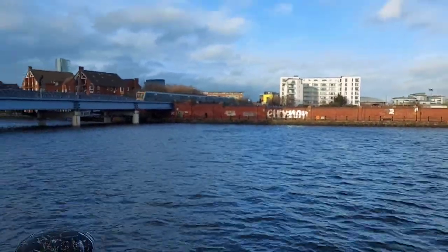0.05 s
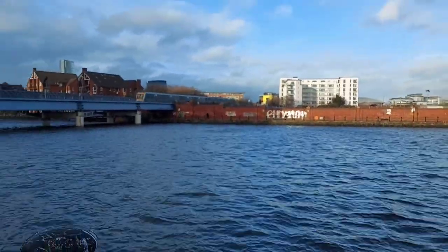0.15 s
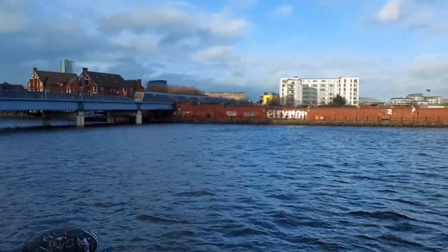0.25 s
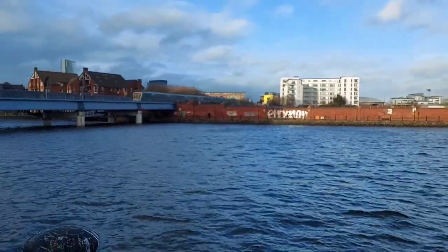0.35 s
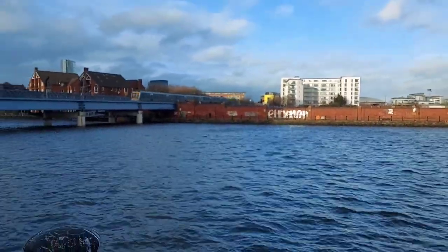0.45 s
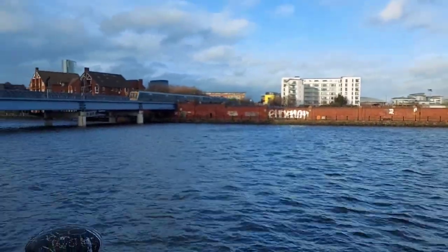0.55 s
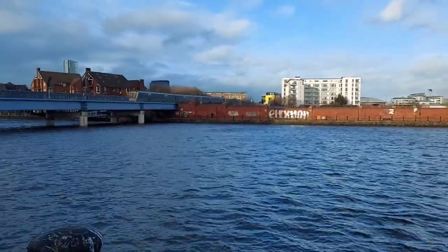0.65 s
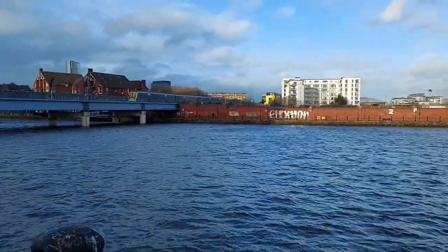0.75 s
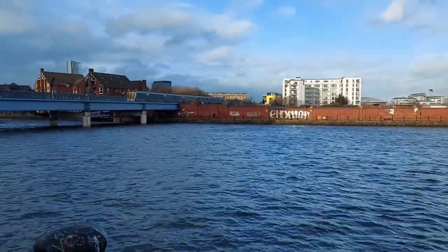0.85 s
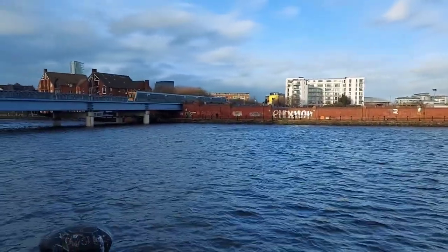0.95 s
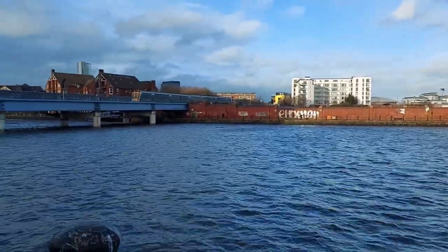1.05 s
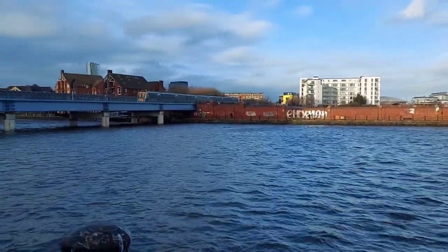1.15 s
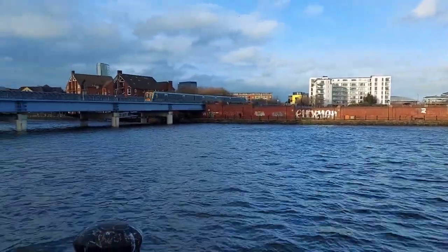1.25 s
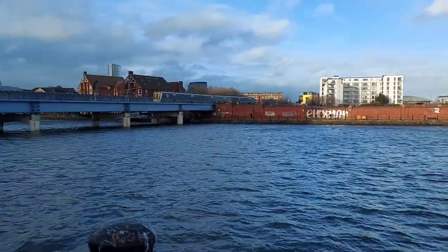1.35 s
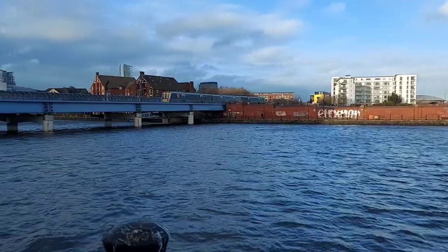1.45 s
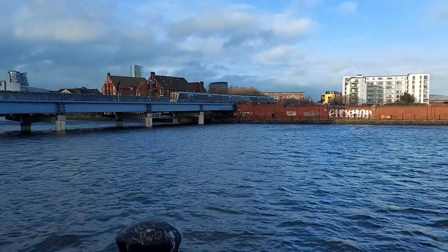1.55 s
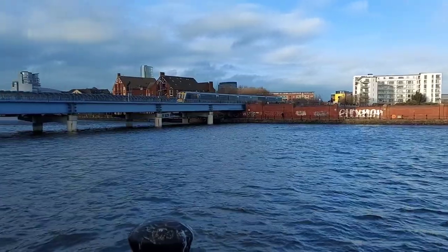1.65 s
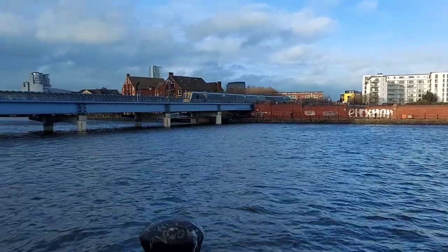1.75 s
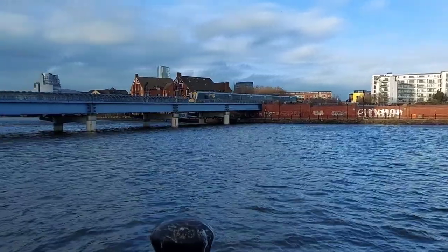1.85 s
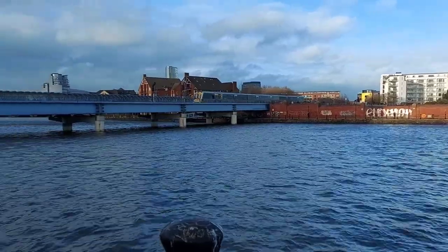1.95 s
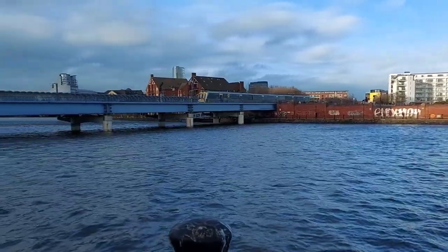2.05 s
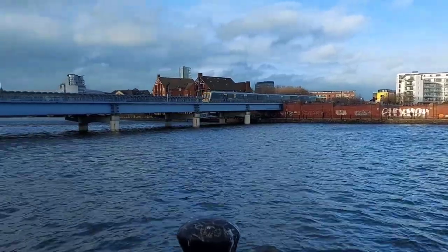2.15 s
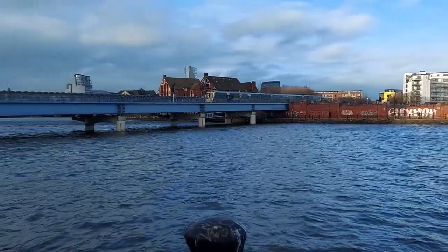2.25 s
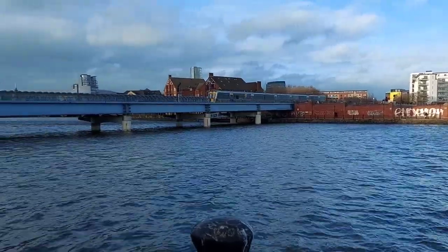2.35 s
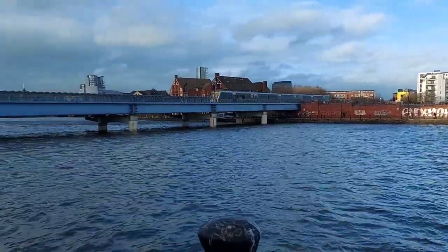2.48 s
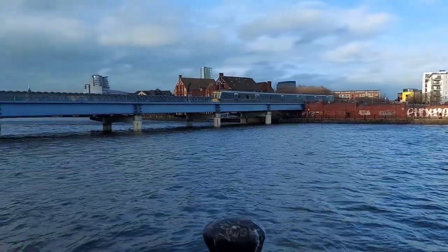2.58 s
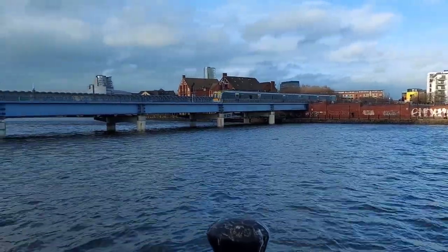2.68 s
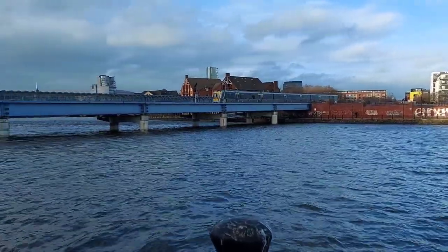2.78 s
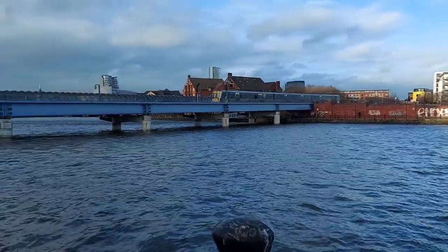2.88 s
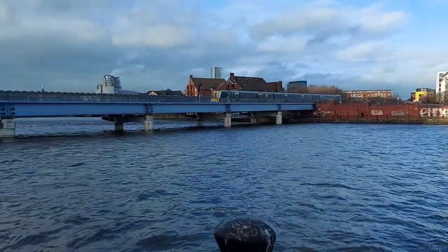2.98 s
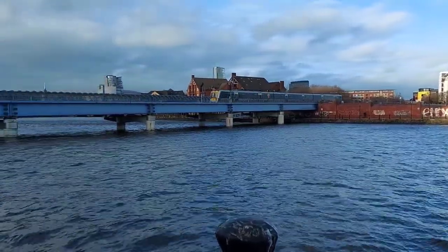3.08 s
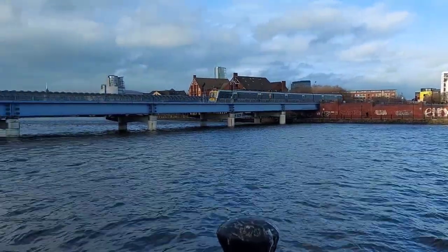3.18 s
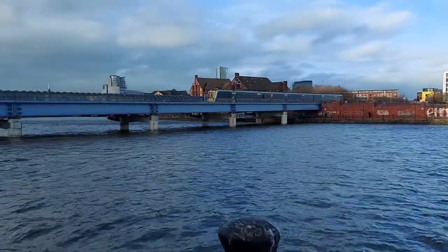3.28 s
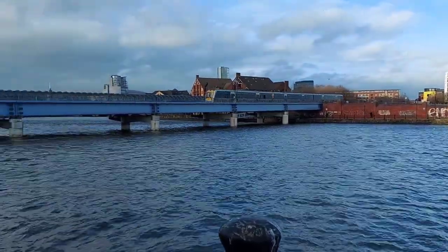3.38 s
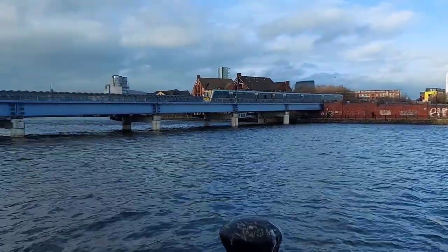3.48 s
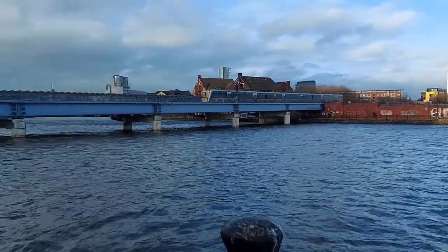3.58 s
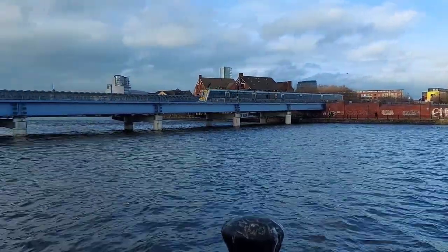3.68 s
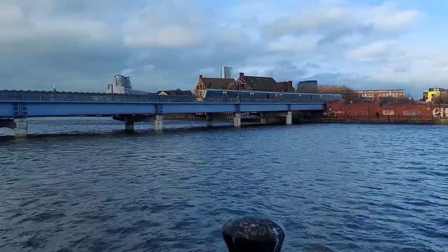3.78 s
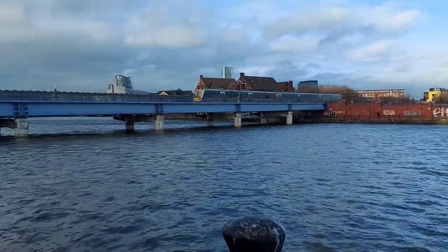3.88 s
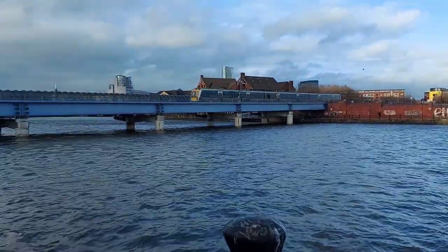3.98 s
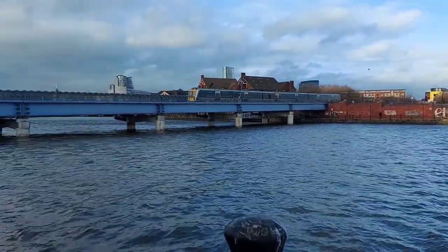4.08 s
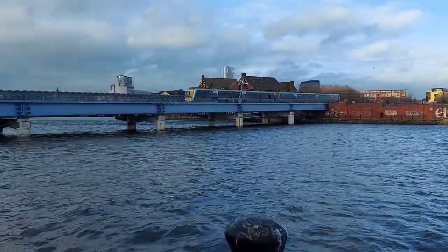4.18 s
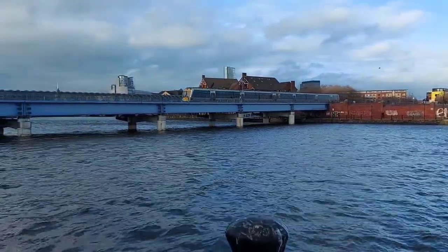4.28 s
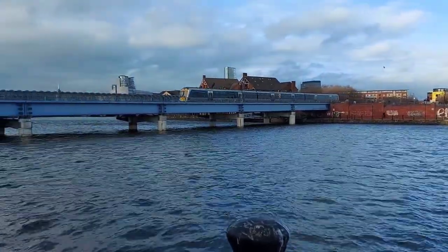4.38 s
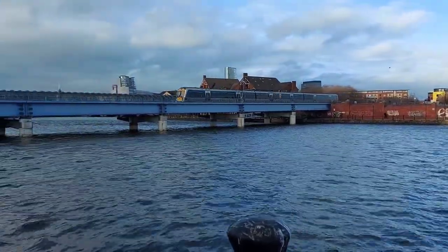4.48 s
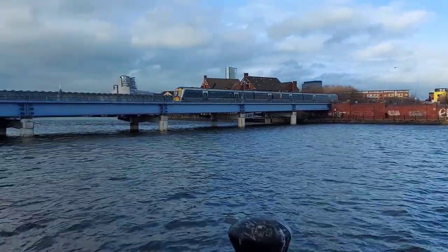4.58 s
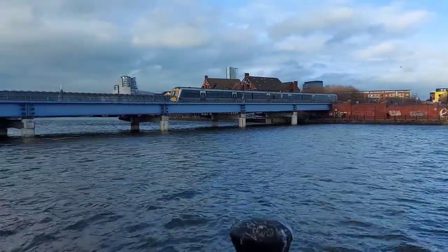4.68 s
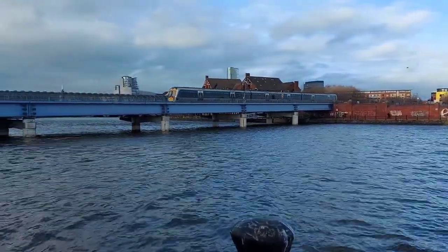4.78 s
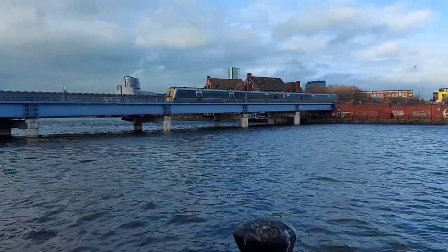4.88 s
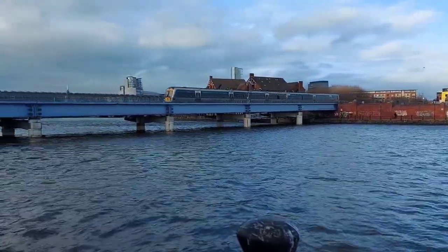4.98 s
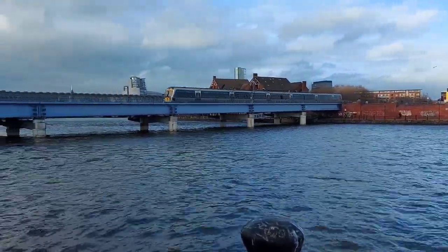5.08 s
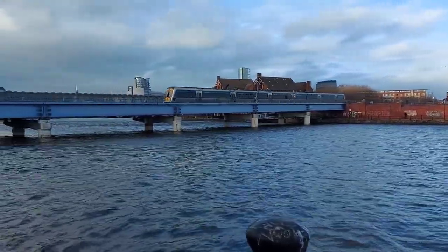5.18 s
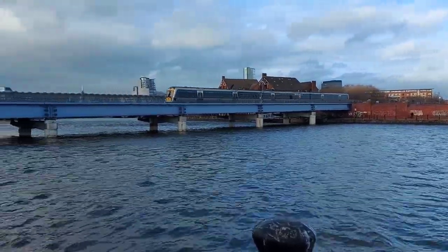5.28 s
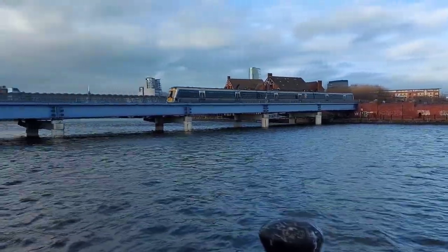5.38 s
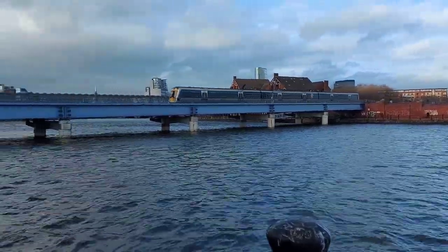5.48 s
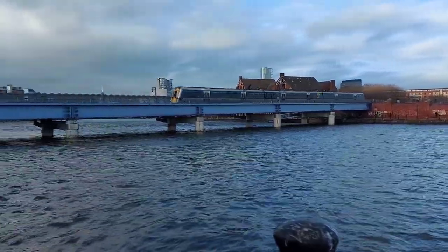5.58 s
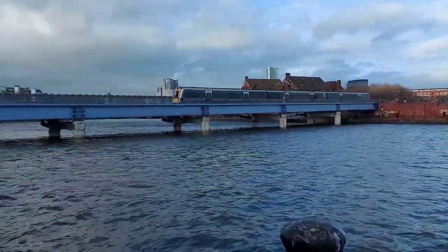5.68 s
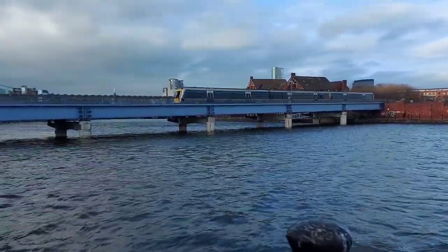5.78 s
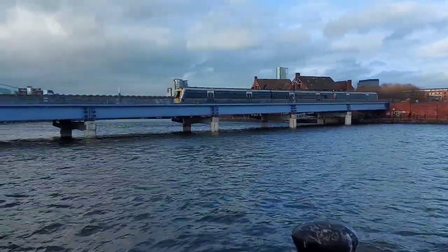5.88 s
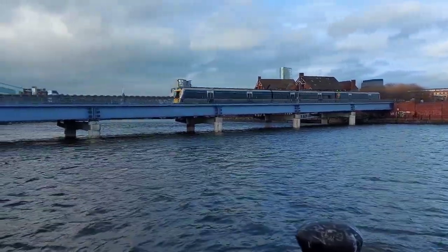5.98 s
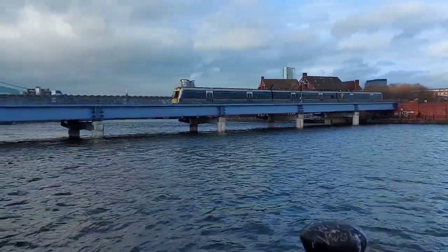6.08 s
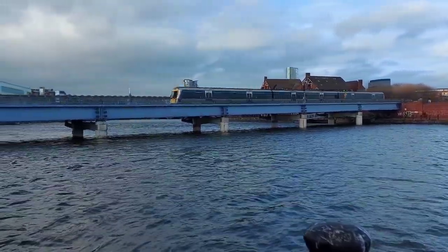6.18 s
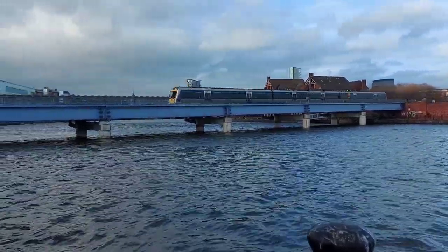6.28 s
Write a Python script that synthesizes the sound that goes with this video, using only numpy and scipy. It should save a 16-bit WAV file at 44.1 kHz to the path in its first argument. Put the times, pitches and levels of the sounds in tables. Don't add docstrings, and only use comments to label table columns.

```python
import sys
import numpy as np
from scipy import signal
from scipy.fft import rfft, irfft, next_fast_len
from scipy.io import wavfile
from scipy.ndimage import uniform_filter1d

SR = 44100
rng = np.random.default_rng(int(sys.argv[2]) if len(sys.argv) > 2 else 0)


def dump_mix(stems):
    frames = np.atleast_2d(stems).T
    limited = np.clip(frames, -1, 1)
    pcm = np.round(limited * 32767).astype(np.int16)
    wavfile.write(sys.argv[1], SR, pcm)


def boost(x):
    u = np.asarray(x, float) / 20
    return 10 ** u


N = 279594
TIME = np.arange(N) / SR

# freq_hz, level_db (per Hz)
TOWN_COLOUR = [(80, 0), (150, -9.5), (330, -7), (600, -16.5), (900, -14.5), (1400, -16.5), (1800, -23),
               (2300, -21.5), (2900, -28.5), (4000, -29.5), (5000, -38), (6700, -40), (8300, -40),
               (12000, -95)]
# freq_hz, level_db (per Hz)
HISS_COLOUR = [(3000, -21), (4500, 7), (6000, 12.5), (8300, 4.5), (12000, -28)]
# freq_hz, level_db (per Hz)
RUSTLE_COLOUR = [(5180, -60), (9000, -25), (9500, -1), (10200, 7), (11000, 9), (12500, 6), (14400, 4),
                 (15300, -6)]
# start_s (centre), level_db, length_s
GUSTS = [
    (.2, -74, 0.52),
    (0.815, -67.5, 0.5),
    (2.22, -76, 0.63),
    (3.45, -74, 0.41),
    (4.449, -78, 0.88),
    (5.7, -75, 0.84),
]
# start_s (centre), peak_db, left_minus_right_db,
# pitch_hz, length_ms
PORT_TICKS = [(.004, -62, -11, 14500, .15), (.0144, -63, -11, 13500, .08), (.0458, -59, -12, 14000, .1),
              (.056, -62, -9, 13000, .1), (.062, -62, -10, 13170, .15), (.0752, -48, -13, 13500, 0.05),
              (.167, -55, -8, 13500, .06), (.3207, -60, -10, 13510, .12), (.328, -57, -10, 14000, .08),
              (3.1627, -62, -1, 11100, .1), (3.253, -68, -1.5, 14500, .15), (3.3553, -63, 0, 11000, .1),
              (3.3745, -52, -4, 12500, .05), (4.2483, -61, 1, 13600, .15), (4.591, -60, -3, 12240, .17),
              (4.6139, -59, 5, 12000, 0.168), (4.7003, -45, 0, 13500, 0.041),
              (4.7546, -59, 5, 12030, .15), (4.9995, -61, 4, 11000, 0.1202),
              (5.1643, -60, -2, 10800, 0.14), (5.295, -63, 1, 13000, .08), (5.5557, -61, -1, 11100, .1),
              (5.6017, -58, -1.5, 11000, .1), (5.7186, -59, -1, 13000, .08),
              (5.8436, -61, -2, 13000, .1)]
# freq_hz, left_minus_right_db
PORT_SHADE = [(60, 0.5), (110, -1), (200, 1), (380, -0.5), (690, 0.0), (1280, 0.0), (2370, 0), (4360, -1.5),
              (8050, -8), (14800, -7)]
# start_s, pitch_hz, level_db
FLANGE_SQUEAL = [(.874, 1533, -75), (.89, 1480, -43), (.93, 1465, -47), (.945, 1480, -51),
                 (1.0, 1470, -49.5), (1.09, 1425, -50), (1.11, 1465, -50), (1.2, 1450, -50),
                 (1.225, 1458, -53), (1.255, 1470, -49), (1.283, 1450, -52), (1.295, 1450, -80)]
# start_s (centre), pitch_hz, level_db, length_s, width_hz
RAIL_CHIRPS = [(0.41, 4290, -51, .06, 60), (.4, 2520, -49, .035, 300), (.643, 2250, -45, .05, 350),
               (.69, 2180, -50, .05, 200), (.615, 2200, -51, .04, 200), (.37, 2230, -53, .09, 400),
               (1.035, 4170, -50, .035, 120), (1.025, 2150, -53, .08, 700), (.883, 1620, -53, .045, 150),
               (1.46, 1450, -51, .05, 150), (2.826, 2750, -49, .03, 300), (2.835, 650, -38, .06, 500),
               (2.85, 1550, -47, .05, 500), (3.073, 1500, -46, .02, 1600), (3.097, 700, -39, .04, 300),
               (3.09, 4300, -52, .05, 900), (3.37, 2300, -52, .08, 400), (4.452, 770, -31, .025, 250),
               (4.475, 2130, -45, .09, 250), (4.605, 950, -45, .05, 250), (4.725, 2150, -47, .05, 350),
               (5.15, 2150, -53, .1, 120), (3.81, 2000, -49, .06, 350), (3.385, 700, -41, .04, 200),
               (5.255, 600, -35, .06, 450), (5.25, 2250, -48, .04, 600), (5.465, 2750, -50, .04, 300),
               (5.47, 4300, -53, .03, 600), (5.525, 2150, -49, .1, 500), (5.58, 4050, -55, .025, 400),
               (5.745, 780, -39, .035, 500), (5.76, 2250, -51, .09, 450), (5.79, 1400, -47, .03, 300),
               (6.0, 1400, -51, .4, 300), (1.285, 2000, -50, .012, 1400), (5.25, 1400, -44, .04, 900),
               (5.745, 3900, -52, .03, 1800), (2.83, 2100, -50, .05, 1200), (3.15, 550, -41, .2, 400)]
# start_s, peak_db, thud_db, middle_db, brightness_db
JOINT_BLOWS = [
    (2.811, -28.5, -19.5, -3, 5.5),
    (3.062, -31, -30, 5, -1),
    (3.8, -44.5, -35, -5, 12),
    (4.441, -26, -30, 0, 4.5),
    (4.705, -28, -29, -2, -2),
    (5.232, -26.5, -23.5, -9, -12),
    (5.457, -30, -25, -5, 1),
    (5.508, -31, -25, 3, -6),
    (5.733, -32, -24, -8, 8.5),
    (5.78, -38, -44, -1, -2),
]
# delay_s, level_db
JOINT_BOUNCES = [
    (0, 7.5),
    (.011, -1),
    (.026, -14),
    (.05, -15),
]
# freq_hz, level_db (per Hz)
CRACK_COLOUR = [(240, -0.5), (400, -2), (788, 2), (921, -6), (1490, -7), (1840, -19), (2120, -12.5),
                (2580, -22.5), (2820, -18.5), (6670, -37.5), (9000, -47), (11700, -75), (19800, -120)]
# pitch_hz, level_db, ring_s
RAIL_MODES = [(770, 1, .06), (600, -6, .08), (1150, -9, .05), (1500, -8, .06), (2800, -16, .05)]
# pitch_hz, level_db, ring_s
DECK_MODES = [(149, 4, 0.049), (223, 8, 0.049), (294.9, 6.5, 0.056)]
# start_s, peak_db, pitch_hz
GIRDER_LURCHES = [(0.084, -36.5, 124.7), (0.252, -32, 138), (0.367, -39, 217), (0.426, -32, 105.7),
                  (0.67, -35, 133), (1.082, -30, 123.5), (1.159, -42, 163), (1.528, -35.5, 232.1),
                  (1.657, -23, 121), (1.677, -29, 178), (1.722, -33, 128), (2.068, -30, 134),
                  (2.265, -29.5, 153), (2.514, -30, 186), (2.616, -30, 149), (2.679, -29, 137),
                  (2.802, -20.5, 148), (2.875, -26, 143), (2.893, -31, 240), (2.965, -29.5, 147.5),
                  (3.049, -30, 122.5), (3.109, -33, 130.5), (3.267, -33, 126.4), (3.326, -30, 178.2),
                  (3.332, -24, 116.1), (3.392, -29, 145), (3.456, -27, 138.5), (3.688, -29.5, 156),
                  (3.779, -22, 132), (4.063, -30, 251.7), (4.109, -29, 137.5), (4.26, -28, 132),
                  (4.423, -31, 180), (4.428, -30, 238.4), (4.584, -24, 143.7), (4.639, -32, 223),
                  (4.713, -23.5, 259.6), (4.731, -37, 178.2), (4.805, -30, 221), (4.853, -25, 144.2),
                  (4.905, -24.5, 105), (5.108, -28, 215.4), (5.176, -28.5, 202), (5.214, -26.5, 243),
                  (5.278, -29, 206), (5.398, -23, 207.2), (5.527, -26, 187.6), (5.617, -23, 148.2),
                  (5.623, -27, 196.3), (5.691, -23.5, 203.4), (5.807, -24, 128.6), (5.853, -25, 191),
                  (5.926, -26, 191.4), (5.988, -22.5, 148), (6.046, -22, 118), (6.118, -29, 188),
                  (6.146, -23, 107.8), (6.16, -25.5, 239.6), (6.22, -22, 155.5)]
# freq_hz, level_db (per Hz)
BOOM_COLOUR = [(12, -53), (20, -30), (70, 8), (86, -2), (160, -4.5), (210, -40), (350, -120)]
# freq_hz, level_db (per Hz)
GIRDER_COLOUR = [(53, -46), (90, 1.5), (172, -9.5), (225, -10), (314, -4), (409, -24), (500, -22.5),
                 (650, -59), (1100, -120)]
# freq_hz, level_db (per Hz)
ROLL_COLOUR = [(220, -3.5), (380, 1), (476, -16.5), (544, -0.5), (622, -1.5), (729, -1), (1100, -10.5),
               (1390, -29), (1710, -19), (2110, -24), (2800, -30), (3640, -64), (6160, -120)]
# pitch_hz, width_hz, level_db
WHEEL_SONG = [(559, 66, -16.5), (2145, 320, -19), (4200, 520, -43)]
# start_s, drive_db
DECK_LOAD = [(0, 2), (.6, -2.5), (1.0, 2), (1.4, 0), (2.0, 2), (2.4, 1), (2.75, 1.5), (3.0, 7), (3.4, 4.5),
             (3.75, 6), (4.2, 2.5), (4.7, 7.5), (5.0, 5), (5.4, 5.5), (5.7, 7.5), (6.0, 5.5), (6.34, 7.5)]
# start_s (centre), level_db, length_s
DECK_LULLS = [
    (0.248, -4, 0.14),
    (0.516, -7, 0.06),
    (1.067, -5, .1),
    (1.5, -3.5, 0.085),
    (1.99, -4, 0.11),
    (2.333, -3.5, 0.074),
    (2.72, -7, 0.099),
    (2.97, -5, 0.081),
    (3.5, -5, 0.043),
    (5.029, -2, .1),
]
# start_s (centre), pitch_hz, level_db, length_s
EXHAUST_THROBS = [(0.122, 70, -40, 0.081), (0.313, 67, -31.5, 0.05), (0.381, 87, -38, 0.083),
                  (0.571, 65.3, -31, 0.03), (0.641, 81.4, -34.5, 0.09), (0.75, 88.7, -33.5, 0.17),
                  (0.9, 81, -25.5, 0.077), (1.016, 83.3, -27.5, 0.094), (1.115, 69.5, -37, 0.04),
                  (1.219, 74.7, -28, 0.11), (1.379, 91.7, -25, 0.11), (1.674, 72.8, -23.5, 0.046),
                  (1.83, 82.8, -22.5, 0.056), (1.932, 82.5, -21.5, 0.04), (2.053, 77.9, -31, 0.072),
                  (2.169, 80.4, -22.5, 0.08), (2.371, 65, -36, 0.04), (2.434, 64.85, -25.5, 0.038),
                  (2.55, 86.1, -25, 0.031), (2.626, 75, -27, 0.056), (2.696, 75.1, -29, 0.036),
                  (2.824, 70.2, -26, 0.066), (2.889, 80.9, -26, 0.06), (3.025, 74.36, -20.5, 0.057),
                  (3.131, 75, -24, 0.085), (3.239, 78, -22, 0.05), (3.344, 75.7, -28, 0.058),
                  (3.454, 72.84, -21.5, 0.036), (3.638, 78, -23, 0.082), (3.831, 81, -20.5, 0.039),
                  (3.921, 75.5, -15, 0.028), (4.087, 74.95, -21, 0.044), (4.184, 73.25, -25, 0.05),
                  (4.33, 67.07, -25, 0.11), (4.612, 65, -29, 0.049), (4.675, 82.8, -29, 0.03),
                  (4.745, 65.1, -25, 0.038), (4.833, 81, -26.5, 0.039), (4.907, 73.3, -27, 0.05),
                  (5.134, 75.2, -24, 0.068), (5.26, 81.04, -24, 0.067), (5.438, 100, -23.5, 0.093),
                  (5.511, 59, -21.5, 0.057), (5.699, 78, -23.5, 0.078), (5.825, 45.96, -28, 0.08),
                  (5.913, 65, -20, 0.041), (6.032, 77.9, -27, 0.11), (6.108, 78, -29, 0.15),
                  (6.262, 75, -26, 0.067)]
# start_s (centre), pitch_hz, level_db, length_s
RIPPLE_HUMS = [(0.092, 303.6, -40, 0.11), (0.158, 304.2, -37.5, 0.15), (0.325, 309, -37, 0.21),
               (0.435, 325, -36, 0.19), (0.615, 320, -35, 0.051), (0.69, 330.3, -40.5, 0.04),
               (0.878, 325, -40, 0.12), (0.996, 321.3, -35, 0.11), (1.265, 324, -34.5, 0.042),
               (1.351, 333.3, -37.5, 0.039), (1.499, 283, -38.5, 0.07), (1.602, 296, -31.5, 0.042),
               (1.696, 296, -32.5, 0.059), (1.79, 304, -30.5, 0.04), (1.898, 306.3, -29.5, 0.038),
               (1.968, 305.3, -34, 0.063), (2.165, 332.5, -32, 0.088), (2.273, 300, -33, 0.049),
               (2.351, 309.7, -33, 0.052), (2.442, 329.4, -28.5, 0.05), (2.54, 310.2, -35, 0.073),
               (2.664, 302.6, -40, 0.041), (2.822, 310.2, -25, 0.03), (2.955, 320.6, -33, 0.16),
               (3.041, 307.5, -32.5, 0.043), (3.131, 320.6, -30, 0.04), (3.259, 288, -29, 0.054),
               (3.332, 271.5, -34, 0.03), (3.416, 334, -31, 0.041), (3.57, 322.9, -30, 0.04),
               (3.698, 320, -28.5, 0.12), (3.811, 318, -31, 0.04), (3.897, 326, -31, 0.04),
               (4.029, 282.5, -34, 0.08), (4.286, 311.5, -40, 0.05), (4.368, 277, -34, 0.1),
               (4.452, 312, -31, 0.058), (4.572, 277, -34, 0.049), (4.829, 283, -33, 0.07),
               (5.094, 300.7, -48, 0.079), (5.517, 278.8, -37, 0.053), (5.641, 268.3, -32, 0.039),
               (5.795, 291, -42, 0.068), (6.024, 326.2, -31, 0.046), (6.144, 296, -31, 0.038)]
# start_s, pitch_hz, level_db
GEAR_WHINE = [
    (5.25, 206, -46),
    (5.4, 205, -39.5),
    (5.7, 196, -41),
    (6.0, 187, -40),
    (6.2, 184, -39),
    (6.34, 180, -41),
]


def curve(table):
    s, *columns = np.transpose(table)
    return [np.interp(TIME, s, c) for c in columns]


def unit(x):
    return x / np.sqrt(np.mean(x ** 2, axis=-1, keepdims=True))


def walk(rate):
    hold = max(int(SR / rate), 1)
    steps = np.repeat(rng.standard_normal(N // hold + 1), hold)
    return unit(uniform_filter1d(uniform_filter1d(steps, hold), hold)[:N])


def swell(s, db, length):
    out = np.zeros(N)
    near = slice(max(int((s - 2 * length) * SR), 0), int((s + 2 * length) * SR))
    out[near] = boost(db) * np.exp(-.5 * ((TIME[near] - s) / (length / 3.34)) ** 2)
    return out


def shape_db(spectrum, hz):
    f, db = np.transpose(spectrum)
    octave, knots = np.log2(hz + 1), np.log2(f)
    knots = np.r_[knots[0] - 1, knots, knots[-1] + 1]
    return np.interp(octave, knots, np.r_[db[0] - 40, db, db[-1] - 40])


def wash(spectrum, patchy_db, channels=1):
    noise = rng.standard_normal((channels, N + 4096))
    hz, s, z = signal.stft(noise, SR, nperseg=2048, noverlap=1024)
    field = rng.standard_normal((36, len(s)))
    field = uniform_filter1d(uniform_filter1d(field, size=3, axis=0), size=3, axis=1)
    band = np.clip(3 * np.log2(hz / 12 + 1), 0, 35).astype(int)
    gain = boost(shape_db(spectrum, hz)[:, None] + patchy_db * field[band] / field.std())
    coloured = signal.istft(z * gain, SR, nperseg=2048, noverlap=1024)[1]
    return unit(coloured[:, 2048:2048 + N])


def apart(x_same, x_own, same):
    same = np.clip(same, 0, 1)
    return np.sqrt(same) * x_same + np.sqrt(1 - same) * x_own


def tone(hz, gain, wander_hz, rate, rough_db):
    phase = 2 * np.pi * np.cumsum(hz + wander_hz * walk(rate)) / SR
    return np.sqrt(2) * gain * boost(rough_db * walk(rate)) * np.sin(phase)


def narrow(hz, width_hz):
    phase = 2 * np.pi * np.cumsum(hz + 0 * TIME) / SR
    return walk(width_hz) * np.sin(phase) + walk(width_hz) * np.cos(phase)


def ring(modes, t, chance):
    hz, db, t60 = np.transpose(modes)[:, :, None]
    chance = chance[:2 * len(modes)].reshape(2, -1, 1)
    decay = np.exp(-np.log(1000) * t / t60)
    swing = np.sin(2 * np.pi * hz * (1 + 0.03 * chance[0]) * t) * decay
    return (boost(db + 1.2 * chance[1]) * swing).sum(axis=0)


def throb(events):
    s, hz = np.transpose(events)[:2]
    gain = sum(swell(s, db, 1.23 * length) for s, _, db, length in events)
    return np.interp(TIME, s, hz), gain


def hiss():
    return boost(np.array([[-70], [-64]])) * wash(HISS_COLOUR, 0.35, channels=2)


def from_left(x):
    return np.array([x, np.roll(x, 20)])


def town():
    db = -58 + 0.33 * curve(DECK_LOAD)[0]
    high_pass = signal.butter(1, 500, "high", fs=SR)
    scattered = signal.lfilter(*high_pass, wash(TOWN_COLOUR, 1.0, channels=2))
    mix = apart(from_left(wash(TOWN_COLOUR, 2.6)[0]), scattered, 0.45)
    passing_car = swell(0.58, -69, 1.8)
    return (boost(db) + passing_car) * boost(17 + 0.24 * walk(9.3)) * mix


def phone():
    rustle = boost(-75) + sum(swell(*gust) for gust in GUSTS) / 2
    out = rustle * wash(RUSTLE_COLOUR, 2.1, channels=2)
    t = TIME[:80] - TIME[40]
    for s, db, pan_db, hz, length_ms in PORT_TICKS:
        i = int(s * SR) - len(t) // 2
        click = np.exp(-.5 * (t / (length_ms / 1000)) ** 2) * np.cos(2 * np.pi * hz * t)
        out[:, i:i + len(t)] += boost(db + 6 + np.array([[pan_db], [-pan_db]]) / 2) * click
    return out


def ports(x):
    size = next_fast_len(N)
    hz = np.arange(size // 2 + 1) * SR / size
    f, db = np.transpose(PORT_SHADE)
    tilt_db = np.interp(np.log(hz + 1), np.log(f), db) / 2
    voice_band_hz = 9220
    top_db = -np.clip((hz - voice_band_hz) / 30, 0, 45)
    return irfft(rfft(x, size) * boost(top_db + np.array([tilt_db, -tilt_db])), size)[:, :N]


def squeals():
    hz, db = curve(FLANGE_SQUEAL)
    gain = boost(db) * (TIME > FLANGE_SQUEAL[0][0]) * (TIME < FLANGE_SQUEAL[-1][0])
    out = boost(-2) * tone(hz, gain, 28, 90, 1.6) + gain * boost(-8) * narrow(hz, 300)
    scrape = walk(SR / 40) + 1j * walk(SR / 40)
    scrape = scrape / np.sqrt(np.abs(scrape))
    for k, (s, hz, db, length, width_hz) in enumerate(RAIL_CHIRPS):
        near = slice(max(int((s - length) * SR), 0), int((s + length) * SR))
        t = TIME[near] - s
        rough = scrape[(k * 7500 + 4000 + t * width_hz * 40).astype(int) % N]
        bell = swell(s, db, length)[near]
        rough = rough / np.sqrt(np.average(np.abs(rough) ** 2, weights=bell ** 2) / 2)
        out[near] += bell * np.imag(rough * np.exp(2j * np.pi * hz * t))
    return np.array([out, np.roll(out, 4)])


def joints():
    out, t = np.zeros((2, N + SR)), TIME[:SR // 2]
    crack = apart(wash(CRACK_COLOUR, .4), wash(CRACK_COLOUR, .4, channels=2), .7)
    body = signal.sosfilt(signal.butter(1, 1000, fs=SR, output="sos"), crack)
    treble = signal.sosfilt(signal.butter(1, 2800, "high", fs=SR, output="sos"), crack)
    middle = crack - body - treble
    chance = rng.standard_normal((len(JOINT_BLOWS), 28))
    ring_s, rise_s, thud_early_s = 0.27, 0.0073, 0.0025
    onset = 1 - np.exp(-(t / rise_s) ** 2)
    decay = np.exp(-np.log(1000) * t / (0.66 * ring_s))
    tail = (1 - np.exp(-t / 0.0024)) * np.exp(-np.log(1000) * t / (2.0 * ring_s))
    thud_onset = 1 - np.exp(-(t / 0.0057) ** 2)
    for (s, db, thud_db, middle_db, bright_db), c in zip(JOINT_BLOWS, chance):
        i = int(s * SR)
        noise = (body + boost(middle_db) * middle + boost(bright_db) * treble)[:, i - len(t):i]
        modes = onset * ring(RAIL_MODES, t, c)
        blow = noise * onset * decay + boost(-4) * modes
        for k, (late, bounce_db) in enumerate(JOINT_BOUNCES):
            j = i + int(late * (1 + 0.19 * c[16 + k]) * SR)
            out[:, j:j + len(t)] += boost(db - 9.5 + bounce_db + 0.87 * c[20 + k]) * blow
        out[:, i:i + len(t)] += boost(db - 10.0) * noise[:, ::-1] * tail
        j = i - int(thud_early_s * SR)
        out[:, j:j + len(t)] += boost(thud_db - 0.5) * thud_onset * ring(DECK_MODES, t, c[10:])
    return out[:, :N]


def lurches():
    late_s, length_s = .02, .05
    return sum(swell(s + late_s, db - 4.0, length_s) * np.sin(2 * np.pi * hz * (TIME - s))
               for s, db, hz in GIRDER_LURCHES)


def engine_and_gears(load, lull_db):
    whine_hz, whine_db = curve(GEAR_WHINE)
    fade_in = np.clip((TIME - GEAR_WHINE[0][0]) / .02 + 1, 0, 1)
    whine = tone(whine_hz, boost(whine_db) * fade_in, 2.5, 25, 2.3)
    drone_hz, throbbing = throb(EXHAUST_THROBS)
    steady = boost(-42 + 1.4 * load + lull_db)
    drone = tone(drone_hz, np.hypot(throbbing, steady), 3.5, 35, .8)
    hum = tone(*throb(RIPPLE_HUMS), 5.104, 30, 0.53)
    return boost(-4.0) * drone + boost(-5.0) * hum + whine


def bridge():
    (load,) = curve(DECK_LOAD)
    lull_db = sum(db * swell(s, 0, length) for s, db, length in DECK_LULLS)
    boom_db = -43 + 0.87 * load + lull_db
    girder_db = -41.5 + load + lull_db
    roll_db = -46 + 0.078 * load + 0.81 * TIME
    boom = apart(wash(BOOM_COLOUR, .6), wash(BOOM_COLOUR, .6, channels=2), .88)
    girder = apart(wash(GIRDER_COLOUR, 2.2), wash(GIRDER_COLOUR, 1.3, channels=2), 1.0)
    roll = apart(wash(ROLL_COLOUR, 1.0), wash(ROLL_COLOUR, 0.57, channels=2), 0.97)
    song = sum(boost(db + 2.0 * walk(6)) * narrow(hz, width_hz) for hz, width_hz, db in WHEEL_SONG)
    rolling = boost(roll_db) * (boost(-1.5 + 1.0 * walk(9)) * roll + song)
    partials = engine_and_gears(load, lull_db) + lurches()
    partials = np.array([partials, np.roll(partials, 8)])
    return boost(boom_db + 4.5) * boom + boost(girder_db + 3.5) * girder + rolling + partials


def scene():
    near = bridge() + joints() + squeals()
    far = town() + hiss()
    shimmer = boost(0.6 * walk(12))
    top = phone()
    return ports(near + far * shimmer) + top


def low_pass(x):
    return signal.sosfilt(signal.butter(12, 15450, fs=SR, output="sos"), x)


def record(dry):
    return low_pass(dry)


dry = scene()
out = record(dry)
dump_mix(out)
```